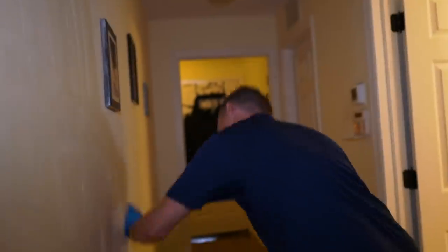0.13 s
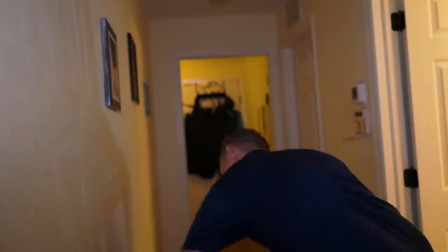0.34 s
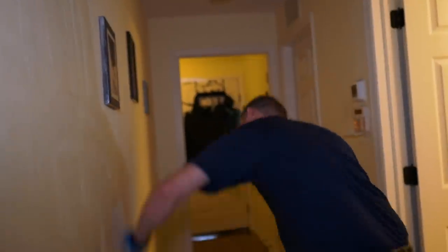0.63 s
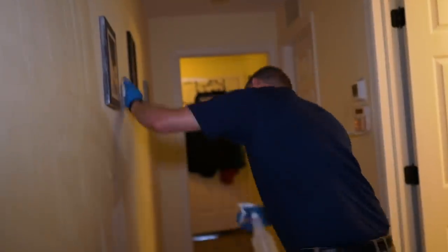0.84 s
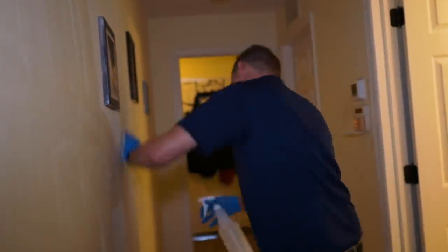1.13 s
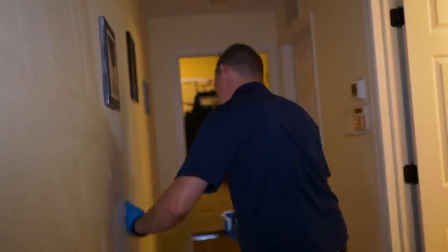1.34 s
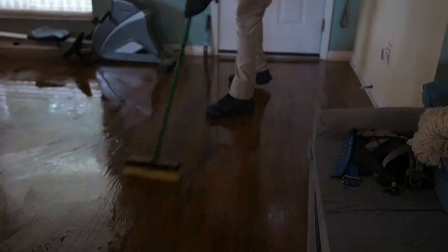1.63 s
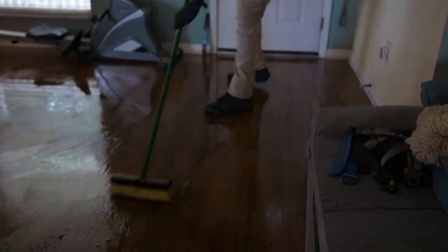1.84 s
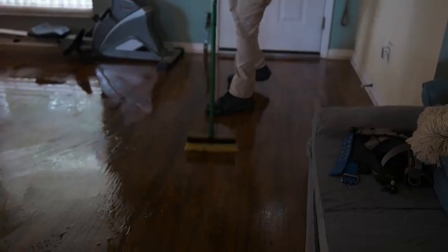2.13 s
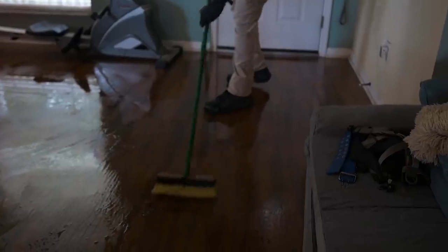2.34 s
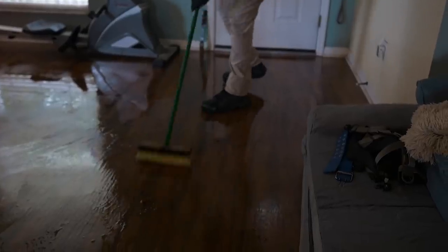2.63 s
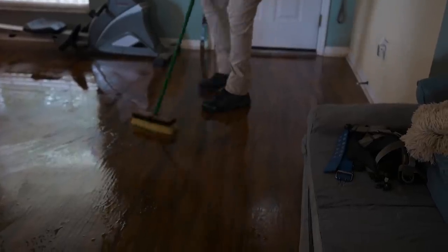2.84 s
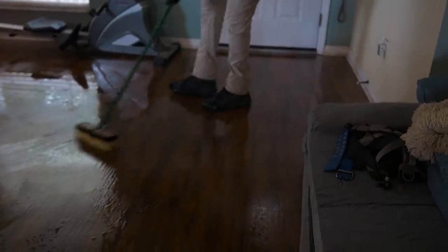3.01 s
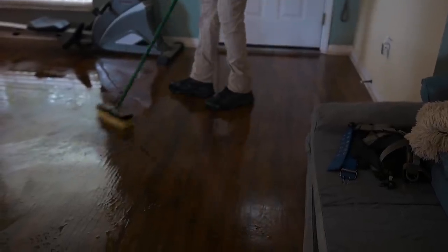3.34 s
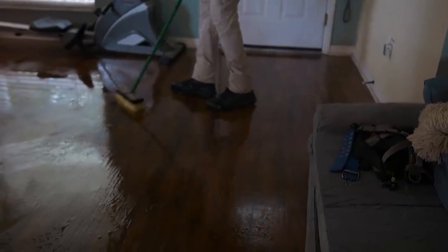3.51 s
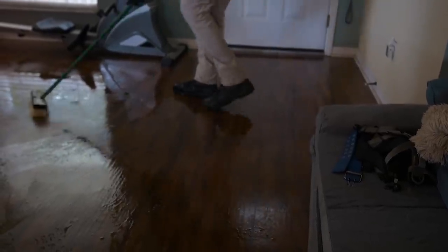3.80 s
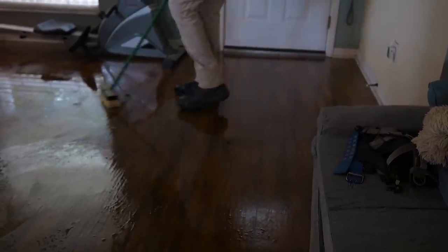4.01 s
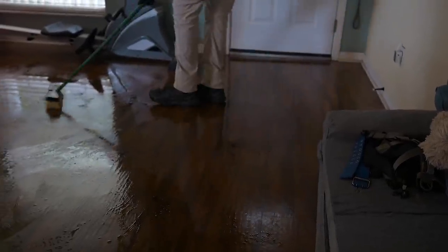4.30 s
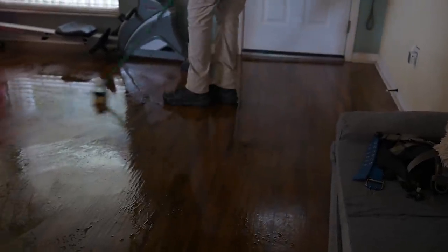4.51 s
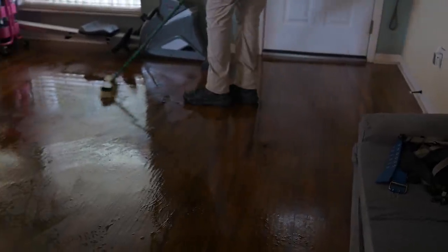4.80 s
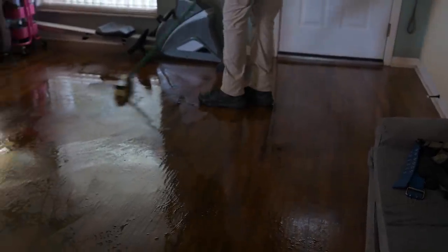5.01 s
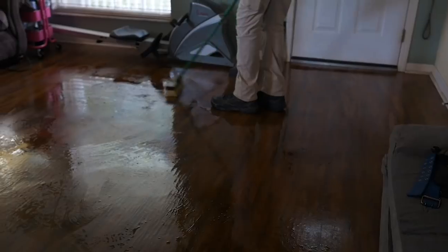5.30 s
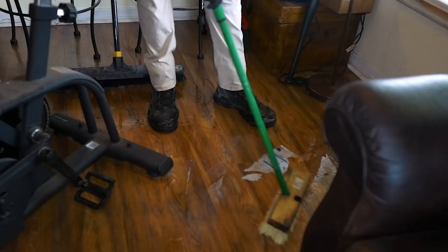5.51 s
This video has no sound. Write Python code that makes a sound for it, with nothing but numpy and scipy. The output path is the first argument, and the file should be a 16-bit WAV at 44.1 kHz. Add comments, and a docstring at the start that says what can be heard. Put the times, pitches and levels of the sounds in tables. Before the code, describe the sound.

A few spray bottle squirts and cloth wipes give way to back-and-forth brush scrubbing on wet floor, over a constant vacuum cleaner drone.

```python
"""In a hallway, vacuum motors hum at shaft speed, their fan blades whine and turbulent air rushes, while
a cloth rubs a wall and a spray bottle hisses, its trigger ticking. Near 1.5 s the cloth squeaks and the
sound cross-fades to a living room, where motors also run and a stiff brush scrubs a wet wooden floor to
and fro. From 3.8 s steps and bumps come through the floor, and from 4.2 s a small metal part jingles on
the brush. One mono microphone hears it all."""
import sys
import numpy as np
from scipy import signal
from scipy.fft import rfft, irfft
from scipy.io import wavfile

SR = 44100
rng = np.random.default_rng(int(sys.argv[2]) if len(sys.argv) > 2 else 0)


def waveform_to_disk(signal):
    """Save audio, clipped to [-1, 1], as 16-bit WAV at the path in sys.argv[1]."""
    frames = np.transpose(np.atleast_2d(signal))
    scaled = np.clip(frames, -1, 1) * 32767
    samples = np.round(scaled).astype(np.int16)
    wavfile.write(sys.argv[1], SR, samples)


N = 249606
TIME = np.arange(N) / SR

# Motor speed. Each row: time in seconds, shaft frequency in Hz.
HALL_SHAFT_HZ = [(0, 300.1), (1.8, 299.9)]
ROOM_SHAFT_HZ = [(1.55, 307.57), (1.75, 305.9), (2.0, 304.8), (2.3, 302.4), (2.7, 301.1), (2.95, 300.3),
                 (5.0, 300.2), (5.6, 301.4)]
# Motor loudness. Each row: time in seconds, shaft tone in dB, blade whine in dB.
HALL_MOTOR_DB = [(0.1, -28, -46), (0.5, -28, -51), (0.75, -32.5, -47), (1.1, -30, -60), (1.45, -33, -62),
                 (1.62, -28.5, -66)]
ROOM_MOTOR_DB = [(1.55, -23, -42), (1.66, -23.5, -43), (1.74, -22, -39.5), (1.85, -22.5, -41),
                 (2.06, -20, -41), (2.23, -20.5, -43), (2.78, -25.5, -47), (4.55, -26, -44),
                 (4.96, -27, -57), (5.54, -25, -52), (5.62, -28, -63)]
# Shaft harmonics. Each row: multiple of the shaft frequency, level in dB.
HALL_HARMONICS = [(2, -51), (3, -58), (6, -55)]
ROOM_HARMONICS = [(2, -48.5), (3, -51.5), (5, -57.5), (6, -56.5), (7, -60)]
# Spectra of rushing air. Each row: frequency in Hz, relative density in dB.
HALL_AIR_SPECTRUM = [(25, -12), (60, -4), (105, 3), (200, 2), (400, 0.5), (900, -1.5), (1500, -7.5),
                     (2400, -10.5), (3300, 0), (3750, -6), (4300, -14.5), (6000, -20), (9000, -22.5),
                     (15700, -30.5)]
ROOM_AIR_SPECTRUM = [(25, -10), (50, 0.5), (85, -16), (160, -8.5), (260, -7), (400, -1), (730, -2.5),
                     (1150, -4), (1600, -9.5), (2300, -5.5), (3500, -3.5), (4200, -10), (6500, -25),
                     (15700, -37)]
# Tones of hose and other motors. Each row: frequency in Hz, width in Hz, dB in hallway, dB in room.
HUMS = [(120, 36, -44.5, -56.5), (211.2, 0.44, -54.5, -55), (405.8, 13.6, -47, -55.5),
        (524.5, 6.4, -57.5, -57), (688, 4.2, -69, -55), (730.4, 70, -85, -45.5), (767, 18, -49, -59.5),
        (940, 20, -57, -59.5), (3333, 460, -49.5, -41)]
# Pitch of a second motor's whine. Each row: time in seconds, frequency in Hz.
SECOND_WHINE_HZ = [(0, 3722), (2.5, 3728), (2.65, 3734), (3.0, 3724), (5.0, 3720), (5.45, 3736)]
# Loudness of that whine. Each row: time in seconds, level in dB.
SECOND_WHINE_DB = [(0, -55), (0.3, -49), (2.5, -58), (2.64, -40), (2.8, -45), (2.95, -52), (3.55, -52),
                   (3.68, -50), (3.9, -44.5), (4.3, -49), (5.15, -43), (5.42, -44), (5.55, -52)]
# Cloth passes. Each row: start, end of rise and start of fade in seconds, level in dB.
CLOTH_PASSES = [(-0.02, 0.08, 0.2, -39.5), (0.2, 0.3, 0.39, -42), (0.6, 0.7, 0.88, -36),
                (1.0, 1.01, 0.97, -38), (1.12, 1.19, 1.25, -39), (1.3, 1.36, 1.2, -52),
                (1.44, 1.53, 2.3, -37)]
# Squirts. Each row: start, end of rise and start of fade in seconds, mist in dB, finest mist in dB.
SQUIRTS = [(-0.05, 0.06, 0.14, -37.5, -41), (0.1, 0.24, 0.32, -39.5, -45), (0.56, 0.69, 0.76, -43, -49),
           (1.004, 1.09, 1.15, -40, -39), (1.14, 1.21, 1.26, -39.5, -54), (1.295, 1.32, 1.354, -40, -35.5)]
# Spectra of cloth and spray. Each row: frequency in Hz, relative density in dB.
CLOTH_SPECTRUM = [(150, -9), (500, -3), (1200, 0.5), (2500, 3), (5000, -14.5), (10000, -24), (15700, -28)]
MIST_SPECTRUM = [(1500, 2.5), (4000, 4), (6000, -1), (8500, -5), (11000, -8), (15700, -20)]
FINE_MIST_SPECTRUM = [(6000, -7), (9000, -8), (11500, -4.5), (13500, -2), (15700, -5.5)]
# Trigger ticks. Each row: time in seconds, impulse level in dB.
TRIGGER_TICKS = [(1.0031, -43), (1.1852, -29), (1.2077, -35), (1.2364, -32), (1.2616, -24), (1.3025, -32)]
# Brush strokes. Each row: turn and fastest moment in seconds, tip level at each in dB, block scrape
# and wet fizz in dB over the tips, exponents that narrow the rise and the fall.
BRUSH_STROKES = [(1.546, 1.693, -53, -36, 1, 4, 1.3, 1.25), (1.88, 2.1, -48.5, -38, 1.5, 4.5, 0.7, 1.1),
                 (2.194, 2.3, -43, -35, -1, 4, 0.95, 0.94), (2.532, 2.8, -50, -40, 0, 6, 0.63, 0.61),
                 (2.9, 3.032, -41, -34.5, -0.5, 2, 1.1, 1.2), (3.24, 3.457, -48, -37, -1.5, 4, 1.14, 0.6),
                 (3.584, 3.747, -37, -29.5, -3, 0.5, 0.46, 1.1),
                 (3.892, 4.048, -41.5, -31.5, -1.5, 0, 0.89, 0.91),
                 (4.168, 4.295, -39, -29.5, 0, 0, 1.1, 1.25),
                 (4.47, 4.602, -39.5, -29.5, -1.5, -1, 1.6, 1.4),
                 (4.745, 4.856, -40.5, -27.5, 0, 0.5, 1.1, 1.8),
                 (5.025, 5.184, -41.5, -31, -1.5, -0.5, 1.2, 1.1),
                 (5.295, 5.44, -37, -28, -1.5, -0.5, 1.2, 1.56),
                 (5.592, 5.75, -43, -33.5, -1.5, 1, 1.2, 1.2)]
# Spectra of bristle tips, brush block and wet film. Each row: frequency in Hz, relative density in dB.
TIP_SPECTRUM = [(3000, -16), (6000, -10.5), (8000, 0.5), (10000, 1.5), (12000, -0.5), (14000, -17),
                (15700, -20)]
BLOCK_SPECTRUM = [(1000, -49), (1700, -12.5), (2300, -2), (3200, 2), (5000, -0.5), (7000, -2.5),
                  (10000, -26)]
FIZZ_SPECTRUM = [(7000, -54), (10000, -6), (12000, 1), (13500, 3), (15000, -0.5), (15700, -3.5)]
# Moments when the bristles bite harder. Each row: start in seconds, gain in dB.
BRISTLE_BITES = [(2.08, 1.5), (3.38, 4.5), (3.73, 1.5), (3.985, 4), (4.29, 3), (5.43, 2.5)]
# Steps and bumps. Each row: start in seconds, impulse level in dB, frequency in Hz, t60 in seconds.
FLOOR_BUMPS = [(3.79, -46, 55, .2), (3.885, -34.5, 60, 0.5), (4.0, -42, 57.9, .15), (4.07, -42, 42, 0.31),
               (4.131, -34, 50, 0.15), (4.382, -34.5, 150, 0.15), (4.381, -30, 233, 0.074),
               (5.0, -42, 45, 0.27), (5.3, -47, 50, 0.27)]
# Impacts of the metal part. Each row: time in seconds, impulse level in dB.
METAL_IMPACTS = [(4.1829, -33), (4.355, -20), (4.3684, -24), (4.3854, -37), (4.4104, -31), (4.4234, -35),
                 (4.4364, -42), (4.4697, -32), (4.776, -33)]
# Modes of the metal part. Each row: frequency in Hz, gain in dB, t60 in seconds.
METAL_MODES = [(13540, -4, .09), (13620, -4, .09), (12510, -14, .08)]

BLADES, WHINE_WOBBLE_HZ = 12, 2.5
CROSS_FADE_START_S, CROSS_FADE_END_S = 1.51, 1.79


def amp(db):
    """Amplitude grows tenfold for every 20 dB."""
    return 10 ** (np.asarray(db) / 20)


def unit_rms(x):
    """Normalisation brings the mean power to 1."""
    return x / np.sqrt(np.mean(x ** 2) + 1e-20)


def curves(rows):
    """Linear interpolation in time gives each later column one value a sample."""
    times, *columns = np.transpose(rows)
    return [np.interp(TIME, times, column) for column in columns]


def coloured(x, spectrum):
    """Filtering imposes a spectral envelope; the result has rms 1."""
    hz, db = np.transpose(spectrum)
    bin_hz = np.maximum(np.arange(N // 2 + 1) * SR / N, 1)
    gain = amp(np.interp(np.log(bin_hz), np.log(hz), db))
    return unit_rms(irfft(rfft(x) * gain, N))


def drift(corner_hz):
    """Noise low-passed by two poles wanders slowly, with rms 1."""
    step, settle = 40, 2000
    pole = np.exp(-2 * np.pi * step * corner_hz / SR)
    noise = rng.standard_normal(N // step + settle + 2)
    slow = signal.lfilter([1], [1, -2 * pole, pole * pole], noise)[settle:]
    return np.interp(np.arange(N) / step, np.arange(len(slow)), unit_rms(slow))


def ring(force, hz, t60):
    """A damped resonator answers a unit impulse with a unit sine that falls 60 dB in t60 seconds."""
    radius, angle = np.exp(-np.log(1000) / (t60 * SR)), 2 * np.pi * hz / SR
    return signal.lfilter([0, np.sin(angle)], [1, -2 * radius * np.cos(angle), radius ** 2], force + 1e-18)


def narrow_noise(hz, width_hz):
    """Noise passed twice through a resonance becomes a wavering tone of rms 1."""
    t60 = np.log(1000) / (np.pi * width_hz)
    once = ring(rng.standard_normal(N + SR), hz, t60)
    return unit_rms(ring(once, hz, t60)[SR:])


def impulse(start_s, db):
    """An ideal impact delivers its push in one sample."""
    force = np.zeros(N)
    force[round(start_s * SR)] = amp(db)
    return force


def shot_noise(spectrum, per_s, spread_db):
    """Dense random impulses of uneven size and sign merge into a hiss of rms 1."""
    sizes = amp(spread_db * np.minimum(rng.exponential(1, N), 4))
    signs = rng.choice([-1, 1], N)
    occurs = rng.random(N) < per_s / SR
    return coloured(sizes * signs * occurs, spectrum)


def swells(rows, level_column, fade_db_per_s, ramp_from):
    """Each envelope rises by a power law and decays exponentially; the strongest prevails."""
    envelope = np.zeros(N)
    for row in rows:
        start, full, fade_start = row[:3]
        rise = (TIME > start) * np.interp(TIME, [start, full], [ramp_from, 1]) ** 0.84
        level_db = row[level_column] - fade_db_per_s * np.maximum(TIME - fade_start, 0)
        envelope = np.maximum(envelope, rise * amp(level_db))
    return envelope


def motor(speed, levels, harmonics, waver_db, flutter_db):
    """Rotating unbalance hums at shaft speed; harmonics and blade whine waver as reflections shift."""
    shaft_db, whine_db = curves(levels)
    angle = 2 * np.pi * np.cumsum(curves(speed)[0]) / SR
    wobble = 2 * np.pi * np.cumsum(WHINE_WOBBLE_HZ * drift(3.4)) / SR
    sound = amp(shaft_db + flutter_db * drift(13)) * np.sin(angle)
    sound += amp(whine_db + 0.5 * waver_db * drift(6.2)) * np.sin(BLADES * angle + wobble)
    for order, db in harmonics:
        sound += amp(db + waver_db * drift(4.8)) * np.sin(order * angle + order)
    return np.sqrt(2) * sound


def air_rush(spectrum, level_db, flutter_db):
    """Turbulence in hose and outlet radiates broadband noise."""
    return amp(level_db + flutter_db * drift(1.8)) * coloured(rng.standard_normal(N), spectrum)


def second_whine():
    """A second motor's fan sounds its blade-passing tone, wavering in pitch and level."""
    level_db = curves(SECOND_WHINE_DB)[0] + 1.1 * drift(7)
    hz = curves(SECOND_WHINE_HZ)[0] + WHINE_WOBBLE_HZ * drift(3.84)
    return np.sqrt(2) * amp(level_db) * np.sin(2 * np.pi * np.cumsum(hz) / SR)


def hums(hall, room):
    """The hose and other motors radiate in narrow bands, each with its own level in either place."""
    return sum(narrow_noise(hz, width_hz) * (hall * amp(hall_db) + room * amp(room_db))
               for hz, width_hz, hall_db, room_db in HUMS)


def cloth_rub():
    """Sliding friction between cloth and wall is a swarm of tiny slips."""
    envelope = swells(CLOTH_PASSES, level_column=3, fade_db_per_s=148, ramp_from=0)
    return envelope * shot_noise(CLOTH_SPECTRUM, per_s=9000, spread_db=0.5)


def spray():
    """Atomisation hisses as soon as the nozzle opens; the finest mist sounds higher and dies sooner."""
    mist = swells(SQUIRTS, level_column=3, fade_db_per_s=146, ramp_from=0.4)
    mist *= shot_noise(MIST_SPECTRUM, per_s=14000, spread_db=0)
    fine_mist = swells(SQUIRTS, level_column=4, fade_db_per_s=204, ramp_from=0.4)
    fine_mist *= shot_noise(FINE_MIST_SPECTRUM, per_s=14000, spread_db=4.5)
    return amp(0.9 * drift(40)) * (mist + fine_mist)


def trigger():
    """Impacts excite three heavily damped modes of the trigger."""
    ticks = sum(impulse(s, db) for s, db in TRIGGER_TICKS)
    return (ring(ticks, hz=7000, t60=0.0026) + 0.8 * ring(ticks, hz=13000, t60=0.0015)
            + 0.3 * ring(ticks, hz=1100, t60=0.0075))


def cloth_squeak():
    """Friction in one short rub sounds a narrow band under a Gaussian envelope."""
    centre_s, half_length_s = 1.52, 0.05
    envelope = amp(-42) * np.exp(-((TIME - centre_s) / half_length_s) ** 2)
    return envelope * narrow_noise(hz=845, width_hz=50)


def stroke_gain(lag_s, turn_offset_db):
    """Friction noise follows sliding speed, a quarter sine from each turn to full speed and back."""
    turn_s, fastest_s, turn_db, full_db, _, _, rise, fall = np.transpose(BRUSH_STROKES)
    knots_s = np.ravel([turn_s, fastest_s], "F")
    progress = np.interp(TIME - lag_s, knots_s, np.arange(len(knots_s)) / 2)   # counted in strokes
    stroke = progress.astype(int)
    nearest_turn = np.minimum((progress + 0.5).astype(int), len(turn_s) - 1)
    speed = np.sin(np.pi * (progress % 1))
    exponent = np.where(nearest_turn == stroke, rise[stroke], fall[stroke])
    turning = amp(turn_db[nearest_turn] + turn_offset_db)
    sliding = amp(full_db[stroke]) * speed ** exponent
    return np.hypot(turning, sliding)


def bite_gain(rise_s, fade_s):
    """Friction jumps as the bristles bite harder, then eases off."""
    gain_db = np.zeros(N)
    for start, db in BRISTLE_BITES:
        age = np.maximum(TIME - start, 0)
        gain_db += db * np.minimum(age / rise_s, 1) * np.exp(-(age / fade_s) ** 2)
    return amp(gain_db)


def brush():
    """Bristles stick and slip in swarms: tips hiss, the block scrapes lower, the wet film fizzes."""
    _, fastest_s, _, _, block_db, fizz_db, _, _ = np.transpose(BRUSH_STROKES)
    tips = stroke_gain(lag_s=0, turn_offset_db=0)
    tips *= shot_noise(TIP_SPECTRUM, per_s=16000, spread_db=0.5)
    block = stroke_gain(lag_s=0.011, turn_offset_db=3)   # the block answers late
    block *= amp(np.interp(TIME, fastest_s, block_db))
    block *= shot_noise(BLOCK_SPECTRUM, per_s=9000, spread_db=-2.5)
    fizz = stroke_gain(lag_s=-0.0059, turn_offset_db=-6.5)   # the film answers early
    fizz *= amp(np.interp(TIME, fastest_s, fizz_db) + 0.5 * drift(30))
    fizz *= shot_noise(FIZZ_SPECTRUM, per_s=11000, spread_db=3)
    clumping = amp(0.67 * drift(21))   # slips come in clumps
    return clumping * (bite_gain(rise_s=0.01, fade_s=0.11) * (tips + block) + fizz)


def floor_bumps():
    """Soft pushes excite low, damped resonances of the floor; a low-pass rounds their onsets."""
    bumps = sum(ring(impulse(s, db), hz, t60) for s, db, hz, t60 in FLOOR_BUMPS)
    return signal.sosfilt(signal.butter(2, 400, fs=SR, output="sos"), bumps)


def jingle():
    """Each impact sets the small metal part ringing in its natural modes."""
    impacts = sum(impulse(s, db) for s, db in METAL_IMPACTS)
    return sum(amp(db) * ring(impacts, hz, t60) for hz, db, t60 in METAL_MODES)


def scene():
    """The sources add by superposition as hallway fades into room; both channels are alike."""
    room = np.interp(TIME, [CROSS_FADE_START_S, CROSS_FADE_END_S], [0, 1])
    hall = 1 - room
    hall_sound = motor(HALL_SHAFT_HZ, HALL_MOTOR_DB, HALL_HARMONICS, waver_db=3, flutter_db=0.36)
    hall_sound += air_rush(HALL_AIR_SPECTRUM, level_db=-34, flutter_db=0.74)
    hall_sound += cloth_rub() + spray() + trigger() + cloth_squeak()
    room_sound = motor(ROOM_SHAFT_HZ, ROOM_MOTOR_DB, ROOM_HARMONICS, waver_db=3.5, flutter_db=0.3)
    room_sound += air_rush(ROOM_AIR_SPECTRUM, level_db=-36, flutter_db=-0.3)
    scrubbing = brush() * np.minimum(1, 8 * room)   # fades in faster than the room
    mix = hall * hall_sound + room * room_sound + second_whine() + hums(hall, room)
    mix += scrubbing + floor_bumps() + jingle()
    return np.stack([mix, mix])


def record(dry):
    """An elliptic low-pass cuts the treble steeply above 15750 Hz."""
    return signal.sosfilt(signal.ellip(14, 0.5, 85, 15750, fs=SR, output="sos"), dry)


dry = scene()
out = record(dry)
waveform_to_disk(out)
```